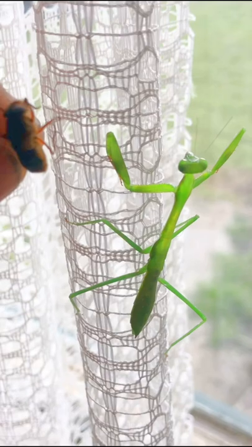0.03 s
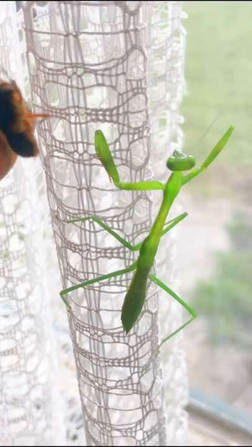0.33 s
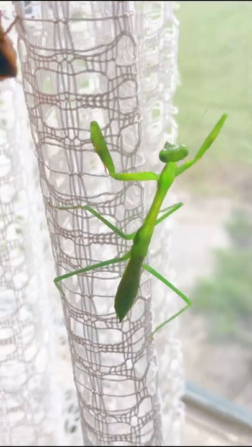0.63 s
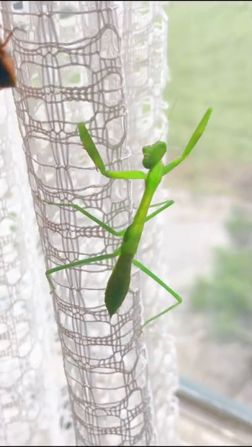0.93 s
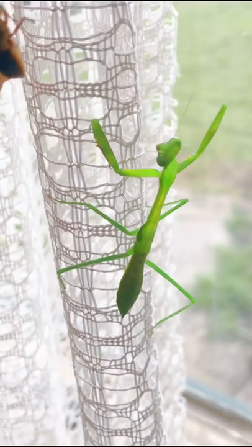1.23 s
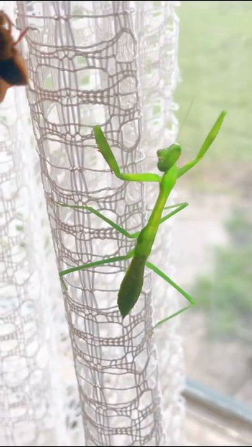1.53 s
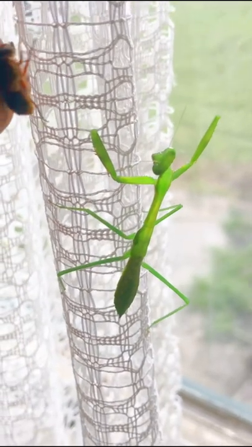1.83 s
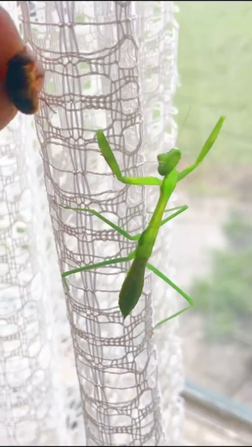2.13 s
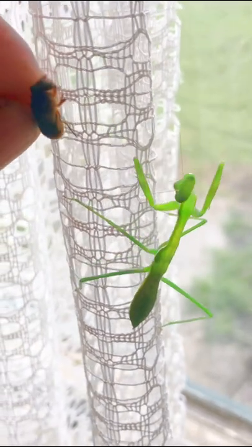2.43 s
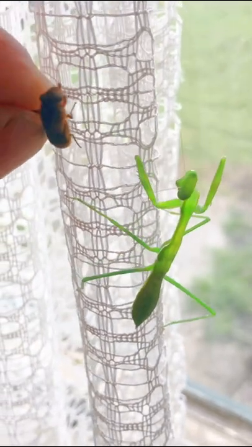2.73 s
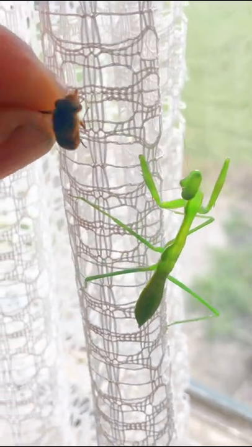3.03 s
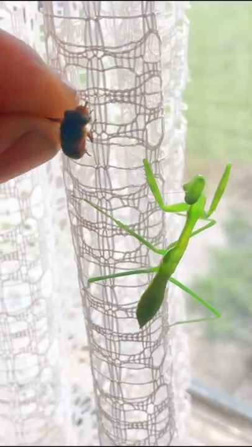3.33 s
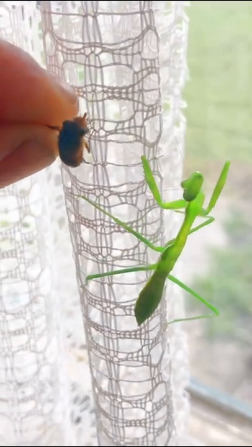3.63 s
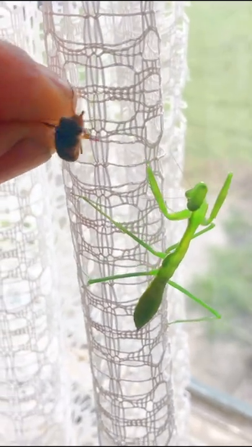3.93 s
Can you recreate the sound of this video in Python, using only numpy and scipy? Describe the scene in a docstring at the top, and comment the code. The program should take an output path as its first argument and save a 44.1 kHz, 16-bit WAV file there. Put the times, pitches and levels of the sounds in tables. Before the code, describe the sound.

Low hum of a distant engine over quiet countryside, with faint birds, insects and one tap.

```python
"""A quiet summer day at a window on to fields. From the start, over still air, a far engine slowly
gathers speed, heard only as a low hum, and insects pulse thinly. Distant birds soon begin to whistle.
About a second and a half in there is one small tap close by. Near the end, as the engine nears its
top speed, something loose at the window buzzes along with it."""
import sys
import numpy as np
from scipy import signal
from scipy.fft import rfft, irfft
from scipy.io import wavfile
from scipy.ndimage import uniform_filter1d

SR = 44100
rng = np.random.default_rng(int(sys.argv[2]) if len(sys.argv) > 2 else 0)


def to_wav(sig):
    """Store sig (one row per channel, or 1-D mono) as 16-bit WAV at the path in sys.argv[1].

    Samples outside -1..1 are clipped; the rate is SR.
    """
    pcm = np.clip(np.atleast_2d(sig), -1, 1) * 32767
    pcm = np.round(pcm).astype(np.int16)
    wavfile.write(sys.argv[1], SR, pcm.T)  # frames by channels


N = 176400
T = np.arange(N) / SR


def from_db(db):
    """Decibels to gain."""
    return 10 ** (np.asarray(db) / 20)


def unit_rms(x):
    """Scale to an rms of 1."""
    return x / np.sqrt(np.mean(x ** 2) + 1e-30)


def curve(rows):
    """Join (seconds, value) rows by straight lines."""
    return np.interp(T, *np.transpose(rows))


def drift(rate_hz):
    """Smooth random wander with a spread of 1."""
    r = np.exp(-2 * np.pi * rate_hz / SR)
    return unit_rms(signal.lfilter([1], [1, -2 * r, r * r], rng.standard_normal(2 * N))[N:])


def noise(colour):
    """Unit-rms noise shaped by an EQ curve of (Hz, dB) points."""
    hz, db = np.transpose(colour)
    bins = np.maximum(np.fft.rfftfreq(N, 1 / SR), 1)
    eq = from_db(np.interp(np.log(bins), np.log(hz), db))
    return unit_rms(irfft(rfft(rng.standard_normal(N)) * eq, N))


def tone(hz):
    """Unit-rms sine that follows a pitch curve."""
    return np.sqrt(2) * np.sin(2 * np.pi * np.cumsum(hz) / SR)


# The EQ of the outdoor bed. Each row: frequency in Hz, relative level in dB.
AIR_COLOUR = [(20,-18),(35,14.5),(60,23.5),(100,13.5),(150,8),(220,2.5),(330,0.5),(500,0),(620,1),(800,-2.5),(1080,1),(1300,1.5),(1600,-3),(2000,-6),(3000,-8),(4000,-11),(6400,-14.5),(8000,-18.5),(11000,-22.5),(14000,-26.5),(16000,-62)]
def air():
    """Still outdoor air: a steady low rumble under a faint hiss."""
    return from_db(-59.5) * noise(AIR_COLOUR)


# The engine's slow climb. Each row: time in seconds, firing rate in Hz.
FIRING_RATE = [(0.05, 37.23), (0.25, 38.44), (0.43, 40.8), (0.64, 45.83), (1.11, 47.99), (1.52, 52.12),
               (2.14, 55.96), (2.5, 58.74), (3.0, 60.9), (3.58, 63.5), (4.0, 64.55)]
# Fader rides for hum harmonics 1 to 4 and the 10th, a faint whine. Each row: time in seconds, level in dB.
HUM_1 = [(0,-58),(.2,-54),(.55,-51.5),(1,-46.5),(1.33,-43.5),(1.55,-49),(1.635,-45),(1.69,-52.5),(1.745,-44),(1.81,-53.5),(1.85,-48),(1.91,-58.5),(2.07,-56.5),(2.2,-51.5),(2.3,-52),(2.7,-46),(3.1,-43),(3.4,-42.5),(4,-42.5)]
HUM_2 = [(0,-49),(.2,-57),(.5,-59.5),(.7,-64),(.92,-55.5),(1.4,-66),(1.8,-64),(2.2,-62),(2.37,-57),(2.85,-56.5),(3.7,-60.5),(4,-60.5)]
HUM_3 = [(0,-62.5),(.48,-62),(.72,-83),(1.02,-66),(1.68,-69.5),(1.85,-88),(2.2,-89),(2.45,-71),(3.15,-73.5),(3.4,-91),(4,-86)]
HUM_4 = [(0,-69),(.5,-87.5),(1.5,-77.5),(2,-91),(4,-111.5)]
HUM_10 = [(0,-101),(1.8,-83.5),(3.4,-85.5),(3.55,-75.5),(4,-80)]
def engine(firing_hz):
    """Only a few harmonics of the firing rate carry this far; each swells and fades on its own."""
    rides = {1: HUM_1, 2: HUM_2, 3: HUM_3, 4: HUM_4, 10: HUM_10}
    waver_db, hum = .3, np.zeros(N)
    for harmonic, ride in rides.items():
        hum += from_db(curve(ride) + waver_db * drift(6)) * tone(harmonic * firing_hz)
    return hum


# The fader ride of the insect chorus. Each row: time in seconds, level in dB.
CHORUS_LEVEL = [(0,-72.5),(.17,-73.5),(.33,-83),(.39,-74.5),(.65,-73.5),(.95,-75),(1.14,-73.5),(1.2,-80),(1.32,-83),(1.38,-74.5),(1.98,-73.5),(2.04,-82),(2.25,-76),(2.4,-75),(3.05,-72.5),(3.55,-72.5),(3.75,-79),(3.86,-73),(4,-74)]
def insect_chorus():
    """Many far callers blur into one thin, throbbing band of noise."""
    centre_hz, width_hz, pulses_per_s, throb_db = 3415, 263, 11.5, 1.5
    edges_hz = [centre_hz - width_hz / 2, centre_hz + width_hz / 2]
    band = signal.butter(2, edges_hz, "band", fs=SR, output="sos")
    blur = unit_rms(signal.sosfilt(band, rng.standard_normal(N)))
    throb = tone(pulses_per_s * (1 + .096 * drift(2.4)))
    return blur * from_db(curve(CHORUS_LEVEL) + throb_db * throb)


# The nearest insect's chirps. Each row: time of the peak in seconds, pitch in Hz, level in dB.
INSECT_CHIRPS = [(.391,3650,-74),(.485,3583,-74),(1.97,3563,-71.5),(2.349,3620,-71.5),(2.429,3650,-71.5),(2.508,3660,-72),(2.59,3690,-70),(2.666,3650,-74),(2.735,3660,-70),(2.808,3637,-68),(2.878,3555,-67.5),(2.973,3520,-68.5),(3.06,3473,-68.5),(3.294,3470,-71.5),(3.88,3492,-68.5)]
def near_insect():
    """Short falling chirps stand out from the chorus, with a light tail from the field."""
    width_s, fall_hz_per_s = .015, 3200
    wobble_hz, chirps = 45 * drift(78), np.zeros(N)
    for peak, hz, db in INSECT_CHIRPS:
        swell = np.exp(-.5 * ((T - peak) / width_s) ** 2)
        chirps += from_db(db) * swell * tone(hz + wobble_hz - fall_hz_per_s * (T - peak))
    return chirps + from_db(-8) * field_reverb(chirps)


def field_reverb(x, t60=.75):
    """The dying scatter from trees and walls."""
    tail = rng.standard_normal(N) * np.exp(-np.log(1000) * T / t60)
    return signal.fftconvolve(x, tail / np.linalg.norm(tail))[:N]


# The bird calls. Each row: start in seconds, length in seconds, opening, middle and closing pitch in Hz,
# level in dB, roughness from 0 to 1.
BIRD_WHISTLES = [(0.631,0.21,1300,1288,1260,-72,.4),(0.721,0.35,1830,1658,1534,-67,0.71),(0.965,0.22,1214,1234,1210,-73,0.48),(1.05,.27,1490,1408,1300,-75.5,0.78),(1.238,0.44,1298,1286,1289,-72,0.19),
                 (1.819,0.1,2070,1940,1825,-70,.5),(1.812,.09,1211,1210,1210,-71,.8),(1.889,0.17,1420,1380,1370,-73,0.3),(1.995,0.257,1180,1184,1196,-66.5,0.3),(2.138,0.14,1250,1260,1254,-70.5,0.21),(2.235,0.14,1193,1209,1197,-69.5,0.44),
                 (2.549,.24,1772,1594,1437,-65.5,.5),(2.559,0.27,1370,1280,1240,-74.5,.9),(3.04,0.17,1500,1431,1380,-73.5,.3),(3.165,0.053,1260,1246,1250,-67.5,0.15),(3.195,0.22,1340,1381,1368,-56,.05),(3.41,0.23,1325,1339,1284,-61,.12)]
def birds():
    """Far whistles, each one arc of pitch; the rougher ones wobble more and arrive more scattered."""
    attack, release = .29, .28   # shares of the length
    wobble_hz = 55.6
    direct, send = np.zeros((2, N))
    for start, length, first, middle, last, db, rough in BIRD_WHISTLES:
        progress = np.clip((T - start) / length, 0, 1)
        arc_hz = np.polyval(np.polyfit([0, .5, 1], [first, middle, last], 2), progress)
        swell = np.clip(np.minimum(progress / attack, (1 - progress) / release), 0, 1)
        call = from_db(db) * swell * tone(arc_hz + rough * wobble_hz * drift(91))
        direct += call
        send += np.sqrt(rough) * call
    return direct + field_reverb(send)


# The EQ of the tap's noise burst. Each row: frequency in Hz, relative level in dB.
TAP_EQ = [(400,-6),(1500,7),(2500,-5),(4300,2.5),(5600,-7),(7300,-16),(9000,-8),(13300,-9),(15000,-34)]
# The tap's two rings, knock then tick. Each row: pitch in Hz, level in dB, seconds to fall by 60 dB.
TAP_RINGS = [(1562,-54.5,0.12),(13700,-55,.005)]
def tap(start_s=1.5748):
    """A small knock, then a bright tick, scattered briefly round the room."""
    attack_s, scatter_t60, tick_delay_s = .006, .22, .003
    age = np.maximum(T - start_s, 0)
    envelope = np.minimum(age / attack_s, 1) * np.exp(-np.log(1000) * age / scatter_t60)
    sound = from_db(-54.5) * envelope * noise(TAP_EQ)
    for k, (hz, db, t60) in enumerate(TAP_RINGS):
        ring_age = np.maximum(age - k * tick_delay_s, 0)
        decay = np.exp(-np.log(1000) * ring_age / t60)
        sound += from_db(db) * decay * np.sin(2 * np.pi * hz * ring_age)
    return sound


# The loose part's squeaks. Each row: pitch in Hz, relative level in dB, place in the cycle from 0 to 1.
SQUEAKS = [(1024,-3,0.06),(1098,-10,0.17),(1161,-2.5,0.41),(1260,-7,0.6)]
# When it buzzes. Each row: start in seconds, end in seconds, level in dB.
BUZZ_BURSTS = [(3.38,3.432,-63),(3.443,3.66,-59.5),(3.644,3.732,-61.5),(3.838,3.907,-68.5)]
def window_buzz(firing_hz):
    """In short bursts, a loose part squeaks upward once in each cycle of the hum."""
    sharpness, uneven_db, wobble_hz, ramp_s = 1.2, 1, 3, .022
    cycles = np.cumsum(firing_hz) / SR
    buzz, gate = np.zeros((2, N))
    for hz, db, place in SQUEAKS:
        rub = np.exp(sharpness * np.cos(2 * np.pi * (cycles - place)))
        buzz += rub * from_db(db + uneven_db * drift(30)) * tone(hz + wobble_hz * drift(17.7))
    # Even out the loudness so that the bursts alone set the level.
    buzz /= np.sqrt(uniform_filter1d(buzz ** 2, size=2100) + 1e-12)
    for start, end, db in BUZZ_BURSTS:
        gate += from_db(db) * np.clip(np.minimum(T - start, end - T) / ramp_s, 0, 1)
    return buzz * gate


def scene():
    """The mono mix, as heard from just inside the window."""
    firing_hz = curve(FIRING_RATE)
    outdoors = air() + engine(firing_hz) + insect_chorus() + near_insect() + birds()
    return (outdoors + tap() + window_buzz(firing_hz))[None]


def record(dry):
    """A quick fade in after a moment of silence, a quick fade out, and a steep cut of the top end."""
    silence_s, fade_s, cutoff_hz = .033, .005, 14700
    fade = np.clip(np.minimum(T - silence_s, T[-1] - T) / fade_s, 0, 1)
    low_pass = signal.ellip(10, .1, 70, cutoff_hz, fs=SR, output="sos")
    return signal.sosfilt(low_pass, dry * fade)


dry = scene()
out = record(dry)
to_wav(out)
```